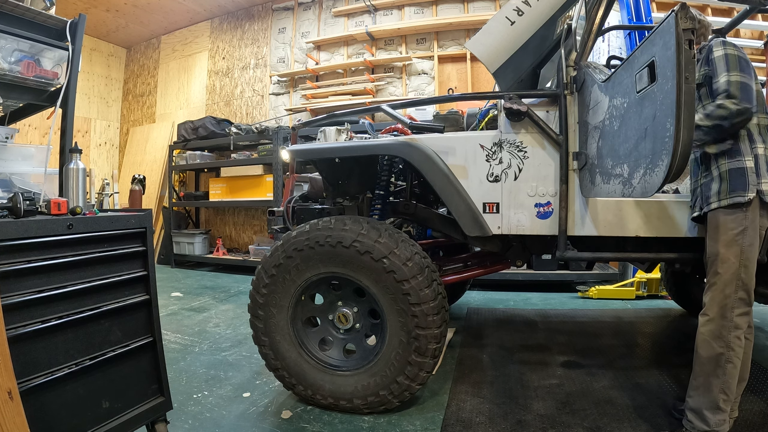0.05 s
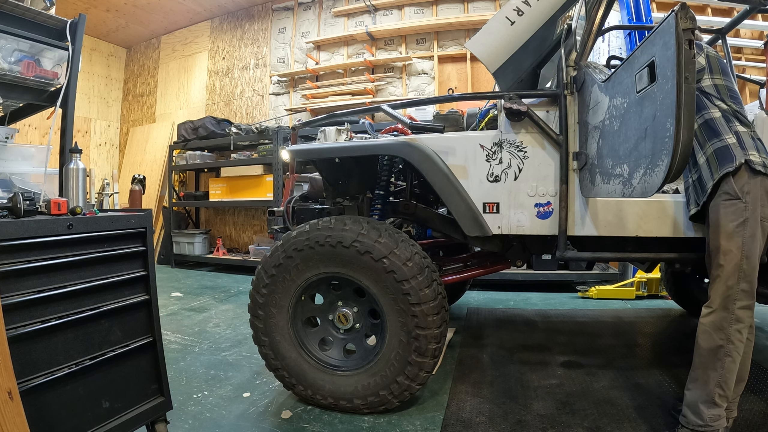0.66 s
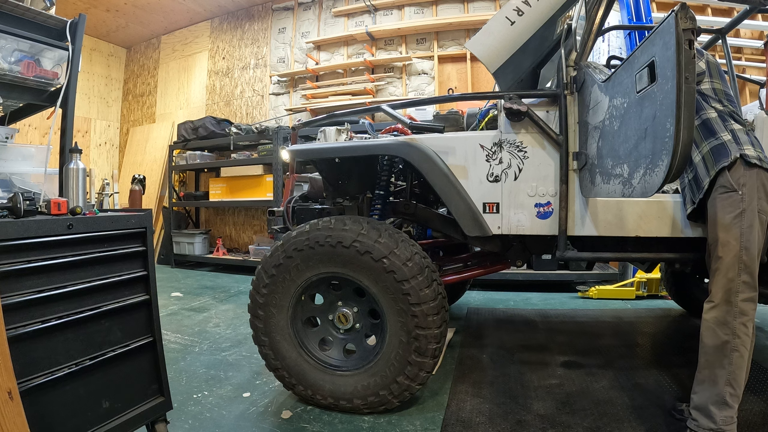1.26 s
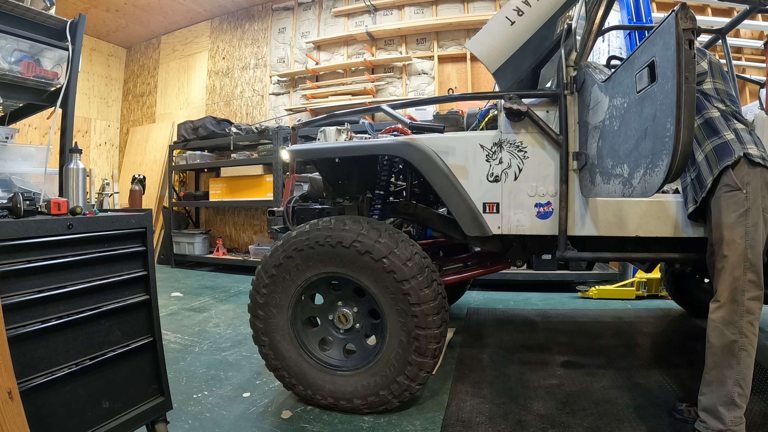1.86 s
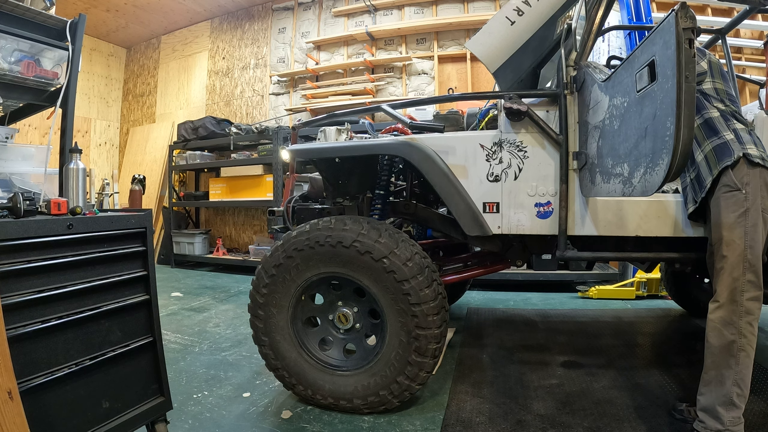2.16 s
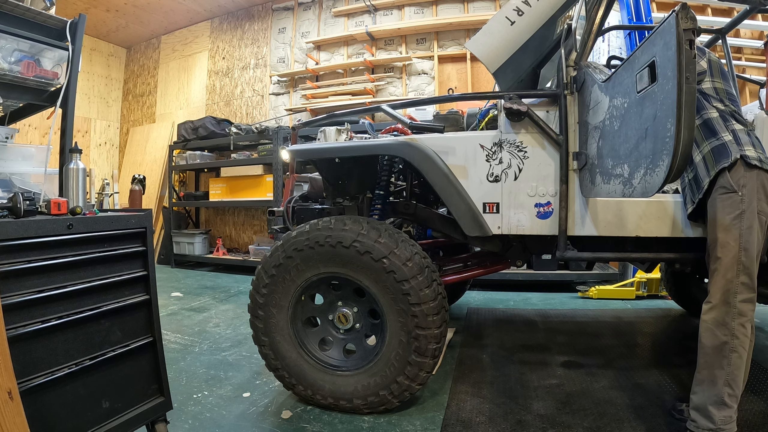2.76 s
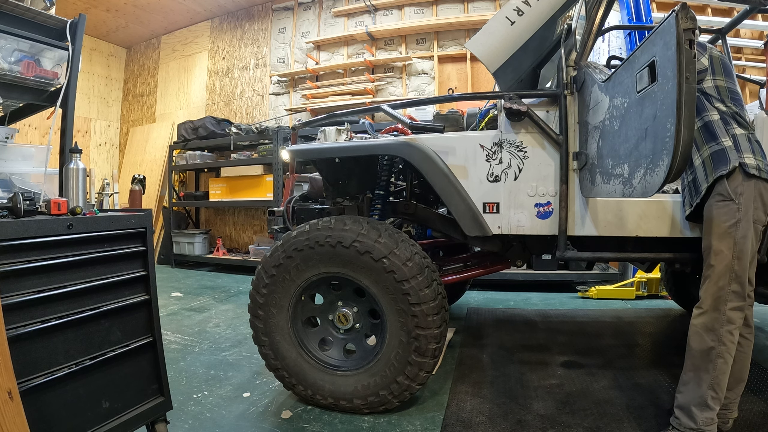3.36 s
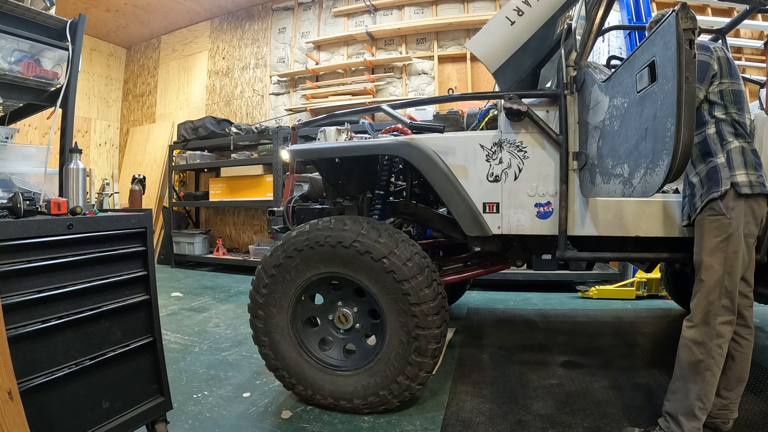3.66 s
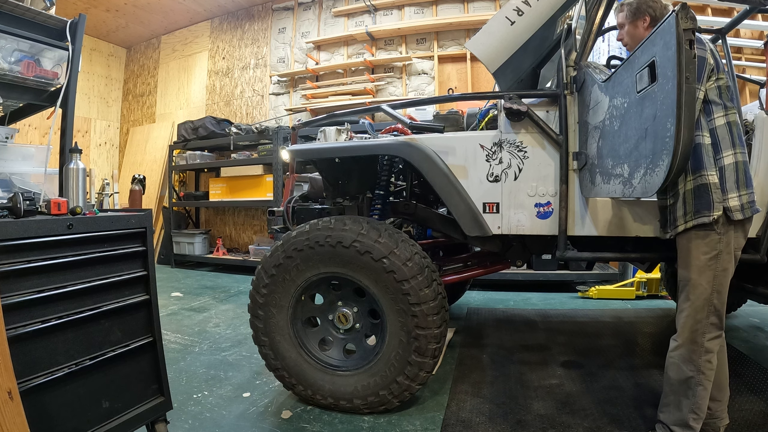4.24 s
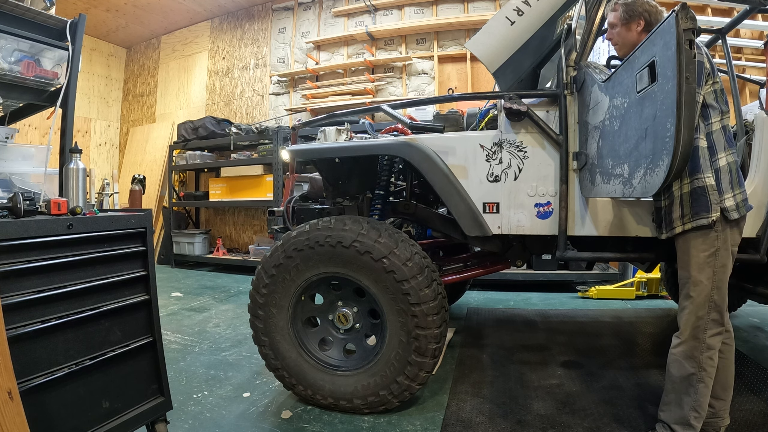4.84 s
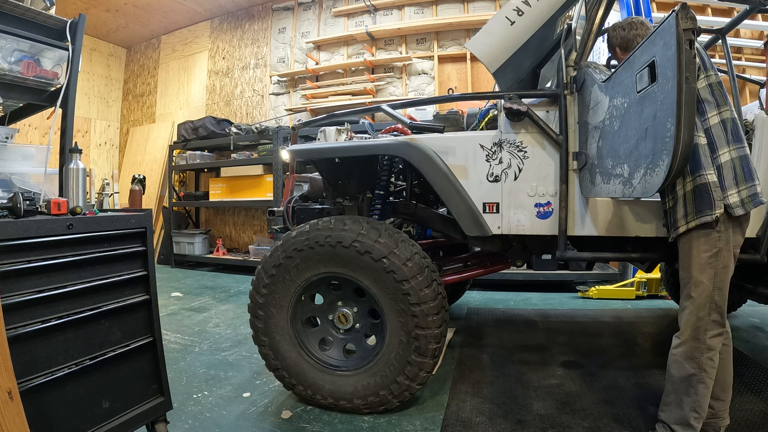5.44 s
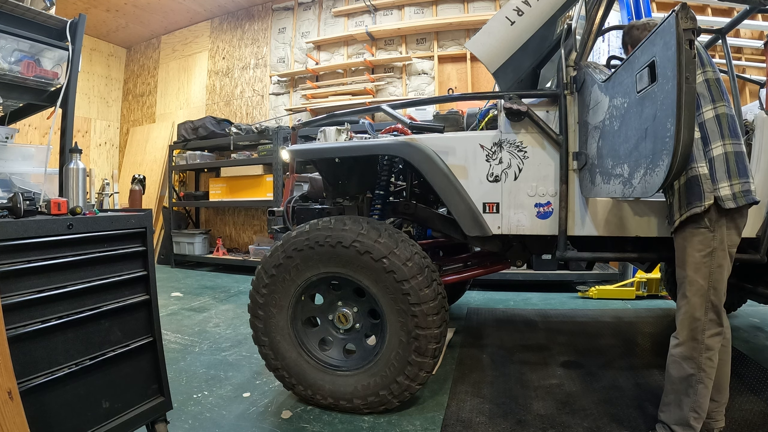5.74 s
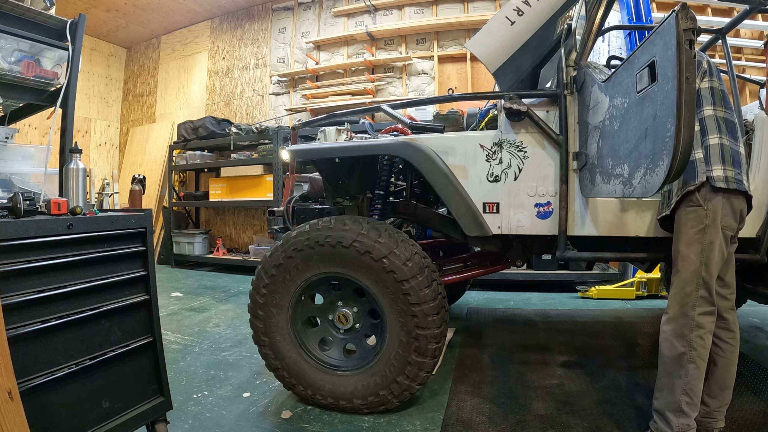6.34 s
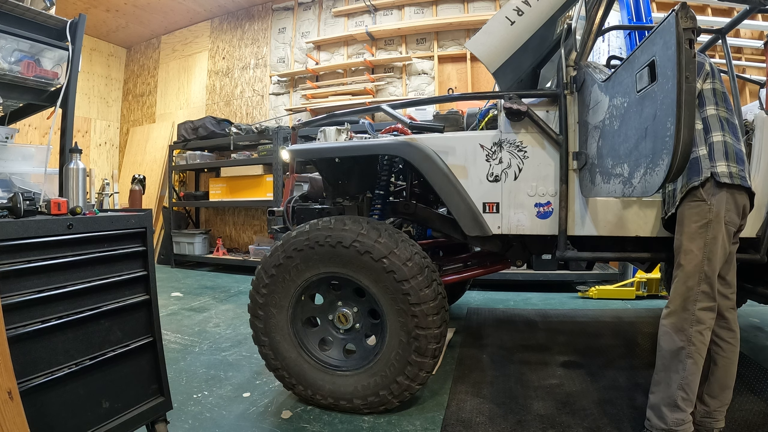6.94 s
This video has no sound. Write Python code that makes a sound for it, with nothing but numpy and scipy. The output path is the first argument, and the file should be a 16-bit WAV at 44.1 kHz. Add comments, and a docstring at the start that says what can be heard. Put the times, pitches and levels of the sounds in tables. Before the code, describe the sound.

After faint clicks, a starter grinds and a large truck engine fires up indoors, burbling at a fast idle before two quick revs.

```python
"""A V8 engine in an off-road truck is started inside a wooden workshop.
Lever and key click, the starter slams in and grinds, and the engine catches, races, settles to a lumpy
fast idle and is revved twice. Its two rows of cylinders (banks) send unequal puffs down the exhaust,
which booms, barks and burbles. Valves tick, belts and fan rush, and the room rings briefly."""
import sys
import numpy as np
from scipy import signal
from scipy.fft import rfft, irfft
from scipy.io import wavfile
from scipy.ndimage import uniform_filter1d

SR = 44100
rng = np.random.default_rng(int(sys.argv[2]) if len(sys.argv) > 2 else 0)


def output_pcm(signal):
    """Save a mono or channel-first signal as 16-bit PCM at the path in sys.argv[1].

    Samples are clipped to [-1, 1] before scaling.
    """
    pcm = np.clip(np.atleast_2d(signal).T, -1, 1) * 32767
    wavfile.write(sys.argv[1], SR, np.round(pcm).astype(np.int16))


N = 317520
TIME = np.arange(N) / SR

# tone colour of the ventilation: f/Hz, level/dB
AIR_SPECTRUM = [(25, -14), (110, -15.5), (175, -5), (310, -18), (400, -16.5), (700, -17), (980, -10),
                (1630, -16), (2850, -46), (5900, -49), (9300, -61), (15000, -69)]
# tones of a faint motor hum: f/Hz, level/dB
HUM_TONES = [(167, -76), (608.3, -62), (958, -70)]
# touches of gear lever and key: t/s, rattle level/dB, knock level/dB, ring f/Hz, ring level/dB
TOUCHES = [(.002, -60, -50.5, 2120, -51.5), (.06, -63, -48, 3800, -54), (.136, -55.5, -44, 5000, -53),
           (.38, -60, -49, 7400, -64), (0.41, -58.5, -43, 7040, -61), (0.695, -58.5, -51, 5000, -51),
           (1.19, -74, -70, 5000, -78)]
# tone colour of their dull knock: f/Hz, level/dB
KNOCK_SPECTRUM = [(40, -1), (200, -2), (480, -2.5), (1200, -2.5), (2500, -11), (6000, -47)]
# their metal resonances (modes): multiple of the ring pitch, width/Hz, level/dB
METAL_MODES = [(.47, 250, -6), (.76, 260, -8), (.95, 150, -3), (1.045, 150, -2.5), (1.48, 250, -9)]
# the truck rocks as someone leans in: t/s, level/dB
BODY_BUMPS = [(.015, -51), (.1, -45), (.35, -49), (.73, -50), (.84, -54)]
# tone colour of the rocking body and engine: f/Hz, level/dB
THUD_SPECTRUM = [(18, -11), (38, -0.5), (65, -2.5), (110, -17.5), (170, -16.5), (300, -21.5), (600, -63.5)]

# the starter gear slams in and is jolted again: t/s, level/dB, t60/s (time to fade by 60 dB)
GEAR_CLACKS = [(1.442, -11, 0.19), (1.463, -26, 0.09), (1.751, -17, 0.17), (1.866, -16, 0.09),
               (2.036, -21, 0.19)]
# tone colours of the clacks and of the grinding gears: f/Hz, level/dB
CLACK_SPECTRUM = [(120, -13), (400, -7), (800, 3.5), (1400, -1.5), (2200, -6), (3000, -5), (5800, -11),
                  (8500, -21), (12500, -33), (15500, -48)]
GRIND_SPECTRUM = [(76, -29), (130, -10.5), (162, 0), (267, -16.5), (368, -9.5), (548, -12), (697, -13.5),
                  (802, -6.5), (1580, -12.5), (1890, -20), (2880, -19.5), (3890, -28), (4660, -18),
                  (12200, -45.5), (15400, -76)]
# compression strokes, each kicking the starter on:
# t/s, gear f/Hz, glide/(Hz per s), whine level/dB, grind level/dB, thud level/dB
CRANK_STROKES = [(1.451, 425.5, 520, -32, -20.5, -18), (1.585, 502.7, -240, -22.5, -25.5, -17),
                 (1.748, 583.2, -220, -26.5, -24, -21.5), (1.86, 621, -550, -27, -21.5, -24),
                 (1.93, 600, 1203, -32.5, -31, -27), (2.032, 735, 450, -30, -24.5, -34)]
# overtones of the meshing teeth: multiple of the gear frequency, level/dB
GEAR_TONES = [(2, 2), (3, -12), (5, -5), (7, -10), (8, -5), (11, -13), (14, -14), (16, -22)]
# how the housing around the gears filters them: f/Hz, level/dB
GEAR_HOUSING = [(1000, 0), (1300, -6), (2400, -1), (2900, -2), (3600, -10), (4600, -4), (5300, -3),
                (6000, 1), (7000, 0), (8000, -8), (12000, -6)]

# engine speed in cycles a second, with eight firings a cycle: t/s, f/Hz
ENGINE_SPEED = [(2.0, 7.37), (2.2, 13.37), (2.35, 14.43), (2.53, 16.55), (2.82, 13.85), (3.05, 13.2),
                (3.24, 11.6), (3.6, 10.96), (4.0, 11.75), (4.52, 12.42), (5.02, 11.57), (5.6, 11.76),
                (6.0, 10.22), (6.68, 9.92), (6.83, 15.0), (7.0, 15.3), (7.2, 18.3)]
# pushes of the throttle for start, idle and revs: t/s, rise/s, hold/s, t60/s, opening (0 to 1)
THROTTLE_PUSHES = [(2.078, 0.042, .16, 1.56, 0.95), (3.1, .07, 0.064, 2.0, .11),
                   (3.35, .95, 1.05, 3.0, .25), (6.62, .03, .07, 0.36, .32), (6.68, .055, .09, .66, .83),
                   (6.985, .075, 0.094, 0.75, 0.71)]
# the cylinders in firing order: bank (0 near, 1 far), level/dB
FIRING_ORDER = [(0, -1), (1, 7.5), (1, 4.5), (0, -1.2), (1, 4.5), (0, 1), (0, -2.1), (1, 0.5)]
# brief dips in the loudness of the exhaust boom: t/s, level change/dB
BOOM_DIPS = [(2.07, -5.5), (2.275, -6), (2.51, -1), (3.05, -3.5), (5.65, -3), (5.83, -3), (6.3, -3),
             (6.6, -4.5), (6.925, -7), (7.16, -5)]
# low and higher resonances of the exhaust and the gap under the truck: f/Hz, width/Hz, level/dB
BOOM_MODES = [(45.2, 23.4, -4.5), (59.3, 16.9, 3.5), (77.8, 22.9, 1.5), (93.6, 14.7, -1), (115, 12.7, -13),
              (156, 11.8, -7.5)]
BARK_MODES = [(183.5, 14.2, -2), (220.2, 9.6, -0.5), (249.4, 11.1, -3), (307.6, 16.5, -7),
              (328.4, 21, -9.5)]
# tone colour of the rushing exhaust gas: f/Hz, level/dB
ROAR_SPECTRUM = [(200, -16), (420, 5.5), (520, 2), (700, 1), (1250, 3.5), (2000, -12), (4000, -44)]
# ringing engine covers and brackets: f/Hz, width/Hz, level/dB
COVER_MODES = [(947, 30, -6), (1135, 110, 0), (1285, 45, -5), (1535, 30, 1), (2366, 60, -12),
               (2850, 200, -13)]
# tone colours of engine clatter, intake hiss (also the key's rattle) and intake gasp: f/Hz, level/dB
CLATTER_SPECTRUM = [(190, -23), (330, -2), (390, -2.5), (780, -1), (1100, 2), (1400, -4.5), (1660, -2.5),
                    (2100, -5.5), (2850, -9), (3560, -17), (5230, -17), (7080, -24.5), (10600, -37.5),
                    (12200, -48), (15000, -75)]
HISS_SPECTRUM = [(1470, -14), (2500, -20), (3240, 1.5), (4560, 1), (7490, -3), (10500, -14.5),
                 (11900, -11.5), (12700, -14), (15400, -65)]
GASP_SPECTRUM = [(4000, -30), (9000, -4), (12300, 0), (15500, -16)]
# tones of the coasting engine: multiple of the cycle rate, level/dB
DRONE_TONES = [(3, -20), (8, -21.5), (10, -29)]
# short ringing chirps near 1.1 kHz in the engine clatter: t/s, relative level/dB
RING_CHIRPS = [(3.7562, -20), (4.3035, -23), (4.52, -24), (4.7605, -31), (5.1017, -24)]

# how much of the echo goes into stereo width: f/Hz, level/dB
STEREO_WIDTH = [(50, -40), (125, -30), (250, -22), (500, -13.5), (1000, -10), (2000, -6.5), (4000, -6),
                (8000, -12.5), (12000, -3)]
# the right side is duller at the very top: f/Hz, left minus right level/dB
TREBLE_TILT = [(4000, 0.02), (8000, 0.5), (12000, 4.5)]


def undb(db):
    """Turn decibels into a gain."""
    return np.exp(np.asarray(db) * (np.log(10) / 20))


def unit(x):
    """Scale to an average (rms) level of 1."""
    return x / np.sqrt(np.mean(x ** 2))


def even(x, span=0.54):
    """Hold the average level near 1 over every stretch of span seconds."""
    size = int(span * SR / 2) + 1
    power = uniform_filter1d(uniform_filter1d(x ** 2, size), size)
    return x / np.sqrt(np.abs(power) + 1e-12)


def noise():
    """White noise."""
    return rng.standard_normal(N)


def walk(rate):
    """Wander at random by about 1, with rate new values a second."""
    size = int(SR / rate)
    held = np.repeat(rng.standard_normal(N // size + 1), size)
    return 1.31 * uniform_filter1d(held, size)[:N]


def ramp(start, length):
    """Rise from 0 to 1."""
    return np.clip((TIME - start) / length, 0, 1)


def fade(start, t60):
    """Start suddenly, then die away."""
    return (TIME >= start) * undb(-60 * np.abs(TIME - start) / t60)


def swell(start, rise, hold, t60):
    """Rise, hold and die away."""
    return ramp(start, rise) * undb(-60 * np.maximum(TIME - start - rise - hold, 0) / t60)


def strikes(times, sizes):
    """Single clicks at the given times."""
    return np.bincount(np.clip(times * SR, 0, N).astype(int), sizes, N + 1)[:N]


def tail(x, seconds):
    """Smooth a signal, giving each click a short tail."""
    pole = np.exp(-1 / (seconds * SR))
    return signal.lfilter([1 - pole], [1, -pole], x)


def colour(x, points, size=8192):
    """Filter a sound along a curve of (f/Hz, level/dB) points."""
    hz, db = np.transpose(points)
    grid = np.maximum(np.arange(size // 2 + 1) * SR / size, 1)
    cepstrum = irfft(np.log(undb(np.interp(np.log(grid), np.log(hz), db))))
    cepstrum[1:size // 2] *= 2  # folded so the filter rings only after a sound
    cepstrum[size // 2 + 1:] = 0
    return signal.oaconvolve(x, irfft(np.exp(rfft(cepstrum))))[:N]


def band(x, low_hz, high_hz, order=3):
    """Keep what lies between two frequencies."""
    return signal.sosfilt(signal.butter(order, [low_hz, high_hz], "band", fs=SR, output="sos"), x)


def resonate(x, modes):
    """Ring several resonances and add them with alternating signs."""
    return sum((-1) ** k * undb(db) * signal.lfilter(*signal.iirpeak(hz, hz / width, SR), x)
               for k, (hz, width, db) in enumerate(modes))


def shop_air():
    """Quiet ventilation and a faint motor hum."""
    hum = sum(np.sqrt(2) * undb(db) * np.sin(2 * np.pi * hz * TIME) for hz, db in HUM_TONES)
    return unit(colour(noise(), AIR_SPECTRUM)) * undb(-55 + 1.3 * walk(3.3)), hum


def lever_and_key(rise_s=.028):
    """Each touch knocks, rattles and sets small metal parts jingling."""
    knock, rattle = unit(colour(noise(), KNOCK_SPECTRUM)), unit(colour(noise(), HISS_SPECTRUM))
    out, shake = 0, noise()
    for s, rattle_db, knock_db, ring_hz, ring_db in TOUCHES:
        modes = [(ring_hz * ratio, width, db) for ratio, width, db in METAL_MODES]
        touch = knock * undb(knock_db) * fade(s, t60=.4)
        touch += rattle * undb(rattle_db) * fade(s, t60=.51)
        touch += unit(resonate(shake, modes)) * undb(ring_db) * fade(s, t60=.44)
        out += ramp(s - rise_s / 2, rise_s) * touch
    return out


def body_bumps():
    """The truck thuds softly as it rocks."""
    gain = sum(undb(db) * fade(s, t60=.29) * ramp(s, .0087) for s, db in BODY_BUMPS)
    return unit(colour(noise(), THUD_SPECTRUM)) * gain


def starter_clacks():
    """A magnet (the solenoid) pulls in, and the starter gear slams into the engine's gear."""
    solenoid = undb(-30) * swell(1.418, rise=.021, hold=0, t60=.044) ** 2
    blows = sum(undb(db - 3) * fade(s - .002, t60) * ramp(s - .002, .0052) for s, db, t60 in GEAR_CLACKS)
    return unit(colour(noise(), CLACK_SPECTRUM)) * (solenoid + blows)


def cranking():
    """The starter fights compression: at each stroke the gears grind and whine, and the engine thuds."""
    starts, kicked_hz, glide, whine_db, grind_db, thud_db = np.transpose(CRANK_STROKES)
    stroke = np.maximum(np.searchsorted(starts, TIME) - 1, 0)
    since_s = np.clip(TIME - starts[stroke], 0, 1)
    gear_hz = tail(kicked_hz[stroke] + glide[stroke] * since_s, .005)

    def kicks(levels, t60, rise=.015, hold=.039):
        """One swell of loudness for each stroke."""
        return np.max([undb(db) * swell(s, rise, hold, t60) for s, db in zip(starts, levels)], axis=0)

    turns = np.cumsum(gear_hz) / SR
    teeth = 1 + .5 * np.sin(2 * np.pi * turns / 4)  # the noise pulses as teeth meet
    grind = unit(colour(noise() * teeth, GRIND_SPECTRUM)) * kicks(grind_db, t60=.8)
    whine = gear_whine(gear_hz) * kicks(whine_db, t60=.9)
    thud = even(colour(noise(), THUD_SPECTRUM), span=.11) * kicks(thud_db, t60=.24, rise=.03, hold=.043)
    return grind, whine, thud


def gear_whine(gear_hz, release_s=2.08):
    """Worn gear teeth sing roughly through their housing until the starter lets go."""
    turns = np.cumsum(gear_hz * (1 + .009 * walk(300))) / SR
    tones = 0
    for k, db in GEAR_TONES:
        gain = undb(db + 2.5 * walk(150) + 3 * walk(22))  # each tone comes and goes on its own
        wobble = .25 * np.sqrt(k) * walk(400)
        tones += gain * np.sin(2 * np.pi * k * turns + wobble)
    return colour(even(tones, span=.1), GEAR_HOUSING) * (1 - ramp(release_s, .044))


def firings(cycles, speed_hz, far_db=-9, far_lag_s=.0042):
    """One pulse for each firing; the far bank arrives weaker and later, which makes the burble."""
    count = len(FIRING_ORDER)
    index = np.arange(int(cycles[-1] * count))
    bank, db = np.array(FIRING_ORDER)[index % count].T
    times = np.interp(index / count, cycles, TIME)
    # at a slow idle the fuel burns less evenly and the balance between the two banks wanders back and forth
    uneven = np.interp(np.interp(times, TIME, speed_hz), [10.3, 11.4], [1.7, 1])
    late_s, scatter_db = uneven * (rng.standard_normal((len(index), 2)) * (.0004, 1.1)).T
    surge_db = 1.2 * uneven * np.interp(times, TIME, walk(11)) * (1 - 3 * bank)
    return strikes(times + far_lag_s * bank + late_s, undb(db + far_db * bank + scatter_db + surge_db))


def exhaust_boom(pulses, opening, coast, dip_db):
    """Each firing booms in the pipes, over a deep rumble."""
    boom = even(band(resonate(pulses, BOOM_MODES), 24, 190), span=.23)
    rumble = unit(band(noise(), 16, 38, order=2)) * undb(-21)
    return (boom + rumble) * undb(-14 + 4.2 * opening ** 1.5 - 2.5 * coast + dip_db)


def exhaust_bark(pulses, opening, coast, speed_hz, idle_hz=11):
    """The sharp, swirling front of each puff barks and roars, louder with throttle and speed."""
    gas = unit(pulses) + unit(tail(pulses, .0049) * noise())
    bark = even(band(resonate(gas, BARK_MODES), 165, 400), span=.1)
    bark *= undb(-32.1 + 10.2 * opening ** .5 - 4.8 * coast)
    roar = even(colour(tail(pulses, .014) * noise(), ROAR_SPECTRUM))
    roar *= undb(-50.5 + 23.5 * opening ** .7 - 6 * coast)
    revs_db = 9 * np.log2(speed_hz / idle_hz)
    return (bark + roar) * undb(revs_db)


def engine_bay(pulses, cycles, opening, coast, valves=16):
    """Valves tick in a repeating pattern, pipes puff, fan and belts rush, and the intake hisses."""
    index = np.arange(int(cycles[-1] * valves))
    valve_db = 3 * rng.standard_normal(valves)[index % valves] + 3.8 * rng.standard_normal(len(index))
    taps = strikes(np.interp(index / valves, cycles, TIME), undb(valve_db))
    ticks = unit(tail(taps, .0036)) * undb(-5)
    puffs = unit(tail(pulses, .026)) * undb(-3)
    fan = undb(5.5 + .61 * walk(6))
    shaking = unit(np.sqrt(ticks ** 2 + puffs ** 2 + fan ** 2))
    # each cover is shaken on its own and rings in fits
    covers = sum(resonate(shaking * noise(), [mode]) * undb(2.2 * walk(9)) for mode in COVER_MODES)
    clatter = even(colour(shaking * noise(), CLATTER_SPECTRUM)) * undb(-.5) + unit(covers) * undb(-5)
    clatter *= undb(-32.8 + 8.4 * opening ** .8 - 2 * coast)
    hiss = even(colour(tail(pulses, .035) * noise(), HISS_SPECTRUM))
    hiss *= undb(-50.6 + 19.7 * opening ** 1.12)
    return (clatter + hiss) * ramp(2.06, .039)


def intake_gasp(opening):
    """Air drawn through a wide-open throttle adds a thin, high hiss."""
    return unit(colour(noise(), GASP_SPECTRUM)) * undb(-50) * opening ** 2


def coasting_drone(cycles, waver_db=2):
    """The even note of the pipes while the engine coasts."""
    return sum(np.sqrt(2) * undb(db + waver_db * walk(20)) * np.sin(2 * np.pi * k * cycles)
               for k, db in DRONE_TONES)


def ring_chirps():
    """Short ringing chirps near 1.1 kHz stand out of the engine clatter."""
    ring = unit(resonate(noise(), COVER_MODES[1:2]))
    return ring * sum(undb(db - 9) * swell(s, rise=.003, hold=.014, t60=.077) for s, db in RING_CHIRPS)


def workshop(x, wet_db, t60=.79, treble_t60=.39):
    """The direct sound plus a short echo off wooden walls, wet_db louder than it."""
    wash = noise()
    low = tail(wash, .00005)
    echo = (low * fade(.00353, t60) + (wash - low) * fade(.0079, treble_t60))[:SR]
    wet = signal.oaconvolve(x, echo / np.sqrt(np.sum(echo ** 2)))[:N]
    return (x + undb(wet_db) * wet) / np.sqrt(1 + undb(2 * wet_db))


def scene():
    """Small noises, starter and engine, mixed in the room in stereo."""
    air, hum = shop_air()
    grind, whine, thud = cranking()
    speed_hz = np.interp(TIME, *np.transpose(ENGINE_SPEED)) * (1 + .012 * walk(14))  # never quite even
    cycles = np.cumsum(speed_hz) / SR
    opening = np.max([amount * swell(*shape) for *shape, amount in THROTTLE_PUSHES], axis=0)
    # coast nears 1 when the engine turns fast with the throttle shut
    coast = np.clip(speed_hz - 12.28, 0, 1) * np.clip(1 - opening / .76, 0, 1)
    dip_db = sum(db * np.exp(-((TIME - s) / .027) ** 2) for s, db in BOOM_DIPS)
    pulses = firings(cycles, speed_hz)
    boom = exhaust_boom(pulses, opening, coast, dip_db)
    bark = exhaust_bark(pulses, opening, coast, speed_hz)
    pipes = (boom + bark) * ramp(1.985, .045) + coasting_drone(cycles) * coast * undb(dip_db)
    # clatter leaves on all sides, so what the walls return differs in fine detail
    bay, bay_echo = (engine_bay(pulses, cycles, opening, coast) for _ in range(2))
    bright = lever_and_key() + starter_clacks() + grind + intake_gasp(opening) + ring_chirps()
    deep = air + body_bumps() + thud + pipes
    mid = workshop(bright, wet_db=-4.5) + workshop(whine, wet_db=-13) + bay + deep + hum
    echoes = workshop(bright + whine + deep, wet_db=34, t60=.2) + bay_echo
    side = colour(echoes, STEREO_WIDTH)  # only echoes differ between the ears
    return np.array([mid + side, mid - side])


def record(dry, ceiling=.98, cut_hz=15200):
    """Tilt the treble to the left, round off the peaks and cut the very top."""
    tilted = np.array([colour(x, [(hz, sign * db / 2) for hz, db in TREBLE_TILT])
                       for x, sign in zip(dry, (1, -1))])
    rounded = tilted / (1 + (tilted / ceiling) ** 6) ** (1 / 6)
    return signal.sosfilt(signal.ellip(8, .2, 70, cut_hz, fs=SR, output="sos"), rounded)


dry = scene()
out = record(dry)
output_pcm(out)
```